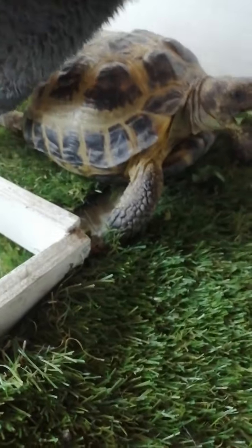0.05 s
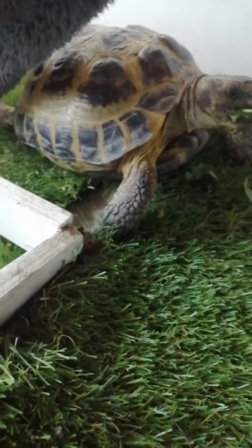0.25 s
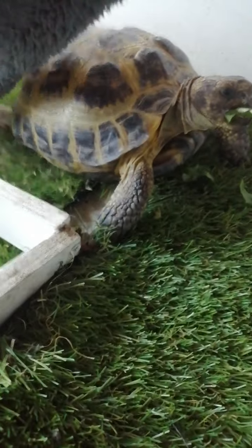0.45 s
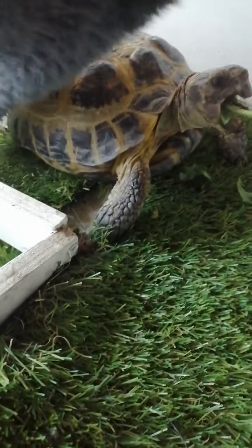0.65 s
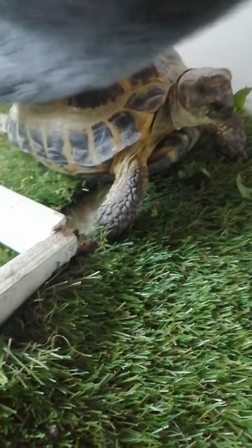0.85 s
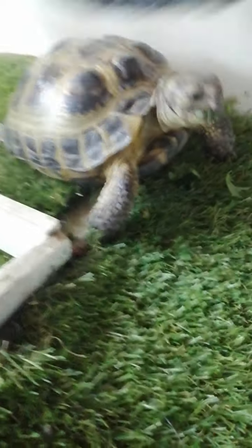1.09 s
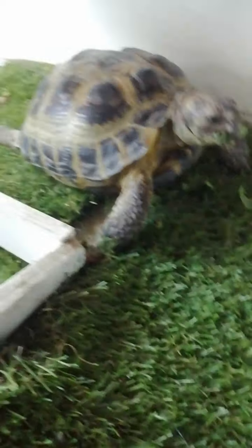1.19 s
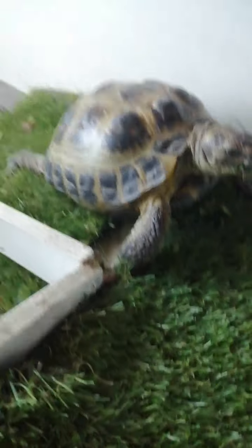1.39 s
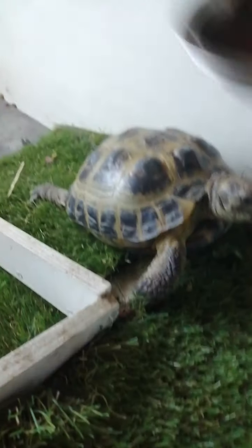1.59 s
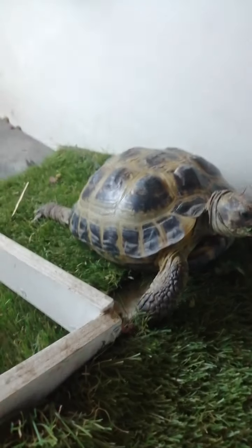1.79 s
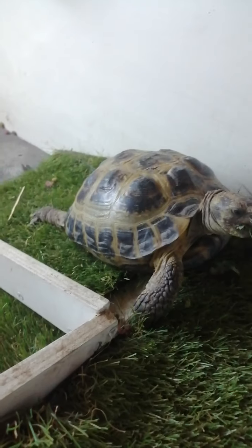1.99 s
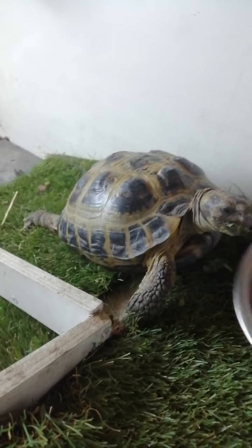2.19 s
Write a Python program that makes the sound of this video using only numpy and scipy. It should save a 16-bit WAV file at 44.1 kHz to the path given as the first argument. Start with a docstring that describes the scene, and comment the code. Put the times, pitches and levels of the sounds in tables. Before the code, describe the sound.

A tortoise bites and crunches a leaf up close, then the handheld camera rubs and bumps

```python
"""Indoors on artificial grass, a tortoise bites and chews a leaf close to a hand-held camera. Small crunches, a
dull bump at the bite and a hollow knock lead to a dense cluster of crunching: shaped bursts of random snaps.
Then the camera is moved: friction noise hisses and rumbles, brushing strokes swell, more dull bumps ring damped
modes and tiny noise puffs tick. A faint steady room noise lies underneath."""
import sys
import numpy as np
from scipy import signal
from scipy.fft import rfft, irfft
from scipy.io import wavfile

SR = 44100
rng = np.random.default_rng(int(sys.argv[2]) if len(sys.argv) > 2 else 0)


def master_out(mix):
    """Clip the mix to full scale and print it as 16-bit PCM to the path in sys.argv[1]."""
    frames = np.transpose(np.atleast_2d(mix))
    ceiling = np.clip(frames, -1, 1)
    pcm = np.round(ceiling * 32767).astype(np.int16)
    wavfile.write(sys.argv[1], SR, pcm)


N = 99225
T = np.arange(N) / SR  # seconds
HZ = np.fft.rfftfreq(N, 1 / SR)

# Spectrum of the still room. Each row: frequency in Hz, relative density in dB per Hz.
FLOOR_COLOUR = [(15, -30), (25, 5), (66, 0.5), (165, -1.5), (298, -28.5), (484, -21.5), (898, -19.5),
                (2070, -20.5), (2780, -19), (4170, -26), (6950, -13.5), (7750, -30.5), (15600, -27)]
FLOOR_DB = -62.5
ROOM_DB, ROOM_T60_S = -12.5, 0.11
SCATTER_DB, SCATTER_T60_S = 5.5, 0.022  # close reflections, level relative to the direct sound

# Rubbing on the camera, from low to high. Each row: time in seconds, level in dB before the trim in rubbing().
RUMBLE_LEVEL = [(0.0, -63), (0.14, -66), (0.28, -74), (0.5, -66.5), (0.64, -76.5), (0.9, -63),
                (1.41, -59.5), (1.62, -55), (1.75, -50.5), (1.8, -48), (2.05, -58), (2.25, -60.5)]
RUB_MID_LEVEL = [(0.76, -80), (0.8, -86.5), (0.876, -79.5), (1.02, -71.5), (1.398, -68.5), (1.424, -63),
                 (1.526, -65), (1.652, -55.5), (2.186, -62.5), (2.25, -55)]
RUB_HISS_LEVEL = [(0.76, -107), (1.124, -63), (1.262, -72), (1.282, -96), (1.498, -75.5), (1.602, -61.5),
                  (1.68, -70), (1.688, -56), (1.776, -64), (1.876, -58.5), (2.054, -68.5), (2.07, -58),
                  (2.128, -70), (2.25, -62)]
RUB_FIZZ_LEVEL = [(0.76, -86), (1.144, -60), (1.494, -71), (1.584, -65), (1.672, -73), (1.688, -61.5),
                  (1.746, -69.5), (2.078, -61.5), (2.146, -65.5), (2.25, -57.5)]
# Spectra of the rumble and of the higher rubbing. Each row: frequency in Hz, relative density in dB per Hz.
RUMBLE_COLOUR = [(25, -31), (50, 0), (85, 10), (120, 0), (160, -7), (195, -5), (265, 12), (330, -1.5),
                 (420, -12.5), (500, -11), (600, -21), (700, -67)]
RUB_COLOUR = [(600, 3), (720, -13), (850, -9.5), (1050, -10.5), (1400, -11), (1900, -10.5), (2250, -8.5),
              (2620, -13), (3200, -11), (4000, -15), (4800, -4), (5600, 7), (6200, 3), (6700, 7.5),
              (7400, -1), (8000, -9), (9000, -20.5), (12500, -31), (14200, -23), (14900, -10.5),
              (15600, -21)]
# Stereo lean of the rubbing. Each row: frequency in Hz, left-right difference in dB.
RUB_BALANCE = [(60, -8), (250, -7.5), (700, -5.5), (1300, -0.5), (2500, -10.5), (4400, -5.5), (6500, -19.5),
               (8000, -4.5), (10000, -4.5), (15000, -9)]
# The hiss's resonance drifts with the grip. Each row: time in seconds, centre in Hz.
HISS_CENTRE = [(0.8, 6700), (1.05, 6480), (1.15, 6900), (1.586, 5900), (1.622, 5600), (1.998, 6930),
               (2.25, 6560)]
HISS_WIDTH_HZ, HISS_RING_DB = 1000, 9
# Resonances of the rubbed case. Each row: frequency in Hz, width in Hz, relative level in dB.
CASE_RINGS = [(427, 58, 4), (828, 64, -2), (1180, 23, -1), (1520, 95, -13.5), (2570, 57, 0.5),
              (2585, 59, -30)]
RUB_GRAINS_PER_S, RUB_SPREAD_DB = 5000, 3.5

# Brushing strokes on the case. Each row: centre in seconds, half length in seconds, level in dB.
STROKES = [(1.653, 0.053, -57), (1.736, 0.021, -58), (1.842, 0.054, -57.5), (1.896, 0.033, -64.5)]
# Resonances that colour the strokes. Each row: frequency in Hz, width in Hz, relative level in dB.
STROKE_RINGS = [(1234, 60, -1), (1486, 110, -1.5), (2597, 210, 1)]

# Dull bumps. Each row: start in seconds, level in dB before the mode's own. The first comes with the bite; the
# rest reach the camera's case.
BUMPS = [(.2, -35.5), (1.2665, -31.5), (1.274, -80), (1.662, -35), (1.682, -26.5), (1.731, -41),
         (1.803, -36.5), (1.862, -42.5), (2.072, -43.5)]
# Modes of a bump. Each row: frequency in Hz, relative level in dB, 60 dB decay in seconds,
# left-right difference in dB, right ear lag in cycles.
BUMP_MODES = [(76, -5, 0.13, -3.5, 0.062), (170, -15, 0.11, -17, 0.0052), (232, -7, 0.089, -16, 0),
              (263.4, 6, 0.052, -3.5, 0.031), (350, -12, .05, -8, 0.034), (510, -24, 0.052, -14, 0.0051)]
# Tiny ticks. Each row: start in seconds, level in dB, brightness in dB per octave.
TICKS = [(.489, -49.5, 12), (1.0655, -49, 1.5), (1.074, -55, -1), (1.152, -46, 4), (1.2, -48, 4),
         (1.2986, -40.5, -13), (1.361, -51.5, -1.5), (1.865, -36.5, -7.5)]
TICK_DECAY_S = 0.002  # time constant

# Hollow knock and its rebounds. Each row: start in seconds, level in dB before the mode's own.
KNOCKS = [(.2535, -17), (.2618, -27), (.305, -43)]
# Modes of the knock. Each row: frequency in Hz, relative level in dB, 60 dB decay in seconds,
# left-right difference in dB, right ear lag in cycles.
KNOCK_MODES = [(177, -18, 0.17, -2, 0), (243.6, -9.5, 0.088, 3.5, 0.095), (330, 3.5, 0.047, -6.5, .05),
               (433, -14.5, 0.19, -7, 0.023), (480.5, -12, 0.13, -5, 0.18), (521, -1, 0.059, -4, 0.017),
               (616, -6.5, 0.029, -12, 0.0019), (760, -4, .045, 11, 0.32), (863, -17, 0.078, 24, 0.36),
               (948, -18, 0.055, 4, 0.17), (1526, -13, 0.017, -9, 0.21)]
BUMP_ATTACK_S, KNOCK_ATTACK_S = 0.0043, 0.0021  # time constants

# Edges of the five crunch bands, bass to fizz: a plain list in Hz.
BAND_EDGES = [70, 600, 2000, 4000, 8000, 16000]
# Crunches of the leaf. Each row: start in seconds, rise in seconds, decay time constant in seconds,
# then bass, body, ring, snap and fizz levels in dB before CRUNCH_TRIM_DB.
CRUNCHES = [ (0.023, 0.032, 0.027, -67, -62.5, -59.5, -48.5, -57),
            (0.195, 0.004, .012, -33, -41.5, -43.5, -40, -55.5),
            (0.21, 0.011, 0.039, -39.5, -54, -54, -44.5, -55.5),
            (0.252, 0.0018, 0.0028, -42, -34.5, -44, -59, -53),
            (0.362, 0.0098, 0.0082, -56, -63, -49.5, -36.5, -56.5),
            (0.399, 0.0039, 0.0064, -49, -69, -62, -45.5, -84),
            (.466, 0.0073, 0.025, -61, -77, -77, -56, -65),
            (0.503, 0.031, 0.071, -60, -63, -61.5, -54.5, -66),
            (0.575, .003, 0.014, -35.5, -32.5, -44, -41, -55),
            (0.585, 0.0071, 0.014, -66, -55, -44.5, -39, -40), (.606, .004, .012, -58, -44, -36, -47, -49),
            (0.613, 0.0067, 0.034, -41, -41, -38, -34.5, -38.5),
            (0.629, 0.012, 0.026, -46.5, -36.5, -37.5, -33.5, -41),
            (0.652, 0.005, 0.011, -56, -35, -25.5, -47, -41),
            (0.668, 0.0051, 0.012, -40.5, -40, -31, -44, -42.5),
            (0.71, 0.0061, 0.0033, -62, -51.5, -46, -42, -47.5),
            (0.788, 0.0027, 0.014, -106, -61, -72, -105, -91),
            (1.413, 0.0093, 0.047, -73, -73, -55, -74, -64)]
# Spectrum of the crunching. Each row: frequency in Hz, relative density in dB per Hz.
CRUNCH_COLOUR = [(70, 14), (130, -15), (230, 8.5), (400, -11), (520, -11.5), (740, -15.5), (950, -12),
                 (1300, -11.5), (1900, -12), (2150, -25), (2400, -7.5), (2750, -9), (2900, -17.5),
                 (3300, -11), (3900, -23.5), (5000, -7), (6400, 3), (7250, -8), (8050, -20.5), (8500, -13),
                 (9100, -18.5), (9750, -11.5), (10400, -22), (11500, -16), (13200, -21), (14200, -25),
                 (14900, -9), (15600, -36)]
# Stereo lean of the crunching. Each row: frequency in Hz, left-right difference in dB.
CRUNCH_BALANCE = [(100, 0.5), (380, -8.5), (700, -4), (1300, 3), (2000, 2), (2600, -11), (3300, 0.5),
                  (4400, -2), (6200, -11), (7200, -7.5), (9000, 2), (15000, -5)]
# Narrow resonances the crunches ring. Each row: frequency in Hz, width in Hz, relative level in dB.
CRUNCH_RINGS = [(502, 21, 16), (674, 16, 7), (957, 49, 9), (1038, 24, -6), (1310, 15, -10), (1620, 50, -26),
                (1902, 37, -5.5), (2302, 19, 8), (2460, 31, -12), (2600, 35, 10), (2800, 29, -2),
                (2777, 31, -8), (3050, 16, -5), (4040, 15, 10), (5300, 80, -15), (7220, 93, 0.5),
                (7125, 100, 1), (7195, 39, 7)]
SNAPS_PER_S, SNAP_SPREAD_DB, TEAR_SHARE = 2500, 3, 0.87
SNAP_ALIKE = 0.56  # left-right likeness, 0 to 1
EAR_LAG_S = 0.00014  # the crunches reach the right ear later
CRUNCH_TRIM_DB = -5
EDGE_HZ = 15750


def amp(db):
    """Decibels to gain."""
    return 10 ** (np.asarray(db) / 20)


def unit(x):
    """Scales to rms 1."""
    return x / np.sqrt(np.mean(x ** 2) + 1e-20)


def read(points):
    """Reads a spectrum on a log-frequency axis."""
    f, value = np.transpose(points)
    return np.interp(np.log(HZ + 1), np.log(f + 1), value)


def curve(points):
    """Reads a control curve at every sample."""
    return np.interp(T, *np.transpose(points))


def ears(balance_db):
    """Left and right gains of constant power."""
    gain = amp(np.array([balance_db, -balance_db]) / 2).reshape(2, -1)
    return gain / np.sqrt(np.mean(gain ** 2, 0))


def shaped(x, gain):
    """Colours a signal and sets its rms to 1."""
    return unit(irfft(rfft(x) * gain, N))


def band(lo, hi):
    """Gain of a steep band-pass between two frequencies in Hz."""
    return 1 / np.sqrt((1 + (lo / (HZ + 1)) ** 16) * (1 + (HZ / hi) ** 16))


def pair(x, alike_below_hz=600):
    """Two signals made alike in the bass, as at two close microphones."""
    a, b = rfft(x)
    same = 0.97 / (1 + (HZ / alike_below_hz) ** 4)
    return irfft(np.array([a, same * a + np.sqrt(1 - same ** 2) * b]), N)


def grains(per_s, spread_db):
    """A random train of clicks, a few of them large."""
    size = amp(spread_db * np.minimum(rng.exponential(1, N), 4))
    fires = rng.random(N) < per_s / SR
    return unit(size * fires * rng.standard_normal((2, N)))


def ringing(x, rings):
    """What narrow resonances give back when a sound drives them."""
    response = sum(amp(db) / (1 + 2j * (HZ - hz) / width) for hz, width, db in rings)
    return irfft(rfft(x) * response, N)


def resonate(x, hz, width_hz):
    """A resonance that follows the curve hz: shift it down to zero, smooth, shift back up."""
    turn = np.exp(2j * np.pi * np.cumsum(hz) / SR)
    r = np.exp(-np.pi * width_hz / SR)
    return 2 * (turn * signal.lfilter([1 - r], [1, -r], x / turn)).real


def struck(blows, modes, attack_s):
    """Blows that ring one set of damped modes, each a decaying sine with a soft attack."""
    out = np.zeros((2, N))
    for start, db in blows:
        t = np.maximum(T - start, 0)[:int(start * SR) + SR // 3]
        attack = 1 - np.exp(-t / attack_s)
        for hz, mode_db, t60, balance_db, lag in modes:
            swing = np.sin(2 * np.pi * (hz * t - np.array([[0], [lag]])))
            decay = amp(db + mode_db - 60 * t / t60)
            out[:, :len(t)] += ears(balance_db) * swing * decay * attack
    return out


def floor():
    """Steady room noise: coloured noise, alike in both ears at the bass."""
    noise = pair(rng.standard_normal((2, N)))
    return amp(FLOOR_DB) * shaped(noise, amp(read(FLOOR_COLOUR))) * ears(-0.83)


def room(x):
    """A faint, short tail from the nearby walls: decaying noise as an echo pattern."""
    t = T[:SR // 3]
    tail = rng.standard_normal((2, len(t))) * amp(-60 * t / ROOM_T60_S) * (t > 0.004)
    return amp(ROOM_DB) * signal.fftconvolve(x, tail / np.linalg.norm(tail[0]), axes=1)[:, :N]


def scattered(x):
    """Dense, fast-fading reflections from shell, floor and camera smear and colour each snap."""
    t = T[:1500]
    taps = rng.standard_normal((2, len(t))) * amp(-60 * t / SCATTER_T60_S)
    taps *= amp(SCATTER_DB) / np.linalg.norm(taps, axis=1, keepdims=True)
    taps[:, 0] += 1  # direct sound
    taps /= np.linalg.norm(taps, axis=1, keepdims=True)
    return signal.fftconvolve(x, taps, axes=1)[:, :N]


def rubbing():
    """Fine friction grains pass the camera's case: a low rumble, case resonances and a drifting hiss."""
    grit = grains(RUB_GRAINS_PER_S, RUB_SPREAD_DB)
    friction = pair(grit + 0.89 * rng.standard_normal((2, N)))
    case = friction + ringing(friction, CASE_RINGS)
    sides = ears(read(RUB_BALANCE))
    low = amp(read(RUMBLE_COLOUR)) * sides
    high = amp(read(RUB_COLOUR)) * sides
    rumble = shaped(case, low * band(18, 430))
    mid = shaped(case, high * band(528, 4440))
    hiss = shaped(friction, high * band(5000, 8400))
    drifting = unit(resonate(hiss, curve(HISS_CENTRE), HISS_WIDTH_HZ))
    hiss = unit(hiss + amp(HISS_RING_DB) * drifting)
    fizz = shaped(friction, high * band(8940, 13700))
    # each level curve is trimmed by a fixed number of dB
    return (amp(curve(RUMBLE_LEVEL) + 2) * rumble
            + amp(curve(RUB_MID_LEVEL) + 2) * mid
            + amp(curve(RUB_HISS_LEVEL) + 6) * hiss
            + amp(curve(RUB_FIZZ_LEVEL) + 1) * fizz)


def strokes():
    """Grainy brushing that swells and fades in a few case resonances."""
    level = sum(amp(db) * np.exp(-((T - centre) / half) ** 2) for centre, half, db in STROKES)
    drive = pair(grains(RUB_GRAINS_PER_S, RUB_SPREAD_DB))
    brushed = 0
    for hz, width, db in STROKE_RINGS:
        once = ringing(drive, [(hz, width, 0)])
        brushed = brushed + ringing(once, [(hz, width, db)])  # second pass steepens the skirts
    return level * ears(-4) * unit(brushed)


def bumps():
    """Dull bumps: low, quickly damped modes with a soft attack."""
    return struck(BUMPS, BUMP_MODES, BUMP_ATTACK_S)


def ticks():
    """Very short puffs of noise, dull or bright, that start at once and die away."""
    out = np.zeros((2, N))
    for start, db, tilt_db in TICKS:
        tilt = amp(tilt_db * np.log2(HZ + 1))
        puff = shaped(pair(rng.standard_normal((2, N))), tilt * band(233, 21000))
        out += amp(db) * puff * (T >= start) * np.exp(-abs(T - start) / TICK_DECAY_S)
    return out * ears(-2.5)


def knock():
    """A hollow knock and its weaker rebounds, all ringing the same damped modes."""
    return struck(KNOCKS, KNOCK_MODES, KNOCK_ATTACK_S)


def crunches():
    """Bursts of snapping leaf fibres swell and die, and ring a set of narrow resonances."""
    snaps = grains(SNAPS_PER_S, SNAP_SPREAD_DB)
    tearing = TEAR_SHARE * rng.standard_normal((2, N))
    a, b = snaps + tearing
    fibres = np.array([SNAP_ALIKE * a + np.sqrt(1 - SNAP_ALIKE ** 2) * b, a])
    lag = np.exp(-2j * np.pi * HZ * np.array([[0], [EAR_LAG_S]]))
    colour = amp(read(CRUNCH_COLOUR)) * ears(read(CRUNCH_BALANCE)) * lag

    power = 0  # one row per band; overlapping bursts add in power
    for start, rise, decay, *levels_db in CRUNCHES:
        t = T - start
        burst = np.clip(t / rise, 0, 1) * np.exp(-np.maximum(t - rise, 0) / decay)
        power = power + (amp(levels_db)[:, None] * burst) ** 2

    bands = [np.sqrt(p) * shaped(fibres, colour * band(lo, hi))
             for p, lo, hi in zip(power, BAND_EDGES, BAND_EDGES[1:])]
    bass, body, ring, snap, fizz = bands
    low = bass + body + ring
    high = snap + fizz
    return amp(CRUNCH_TRIM_DB) * (low + scattered(high) + ringing(low + high, CRUNCH_RINGS))


def scene():
    """Chewing and the knock in the room, plus dull bumps (the first at the bite) and handling noise on the
    camera."""
    near = crunches() + knock()
    chewing = near + room(near)
    bumps_and_handling = bumps() + ticks() + rubbing() + strokes()
    return chewing + bumps_and_handling + floor()


def record(dry):
    """The recorder's band limit: a steep low-pass that keeps the timing."""
    low_pass = signal.firwin(511, EDGE_HZ, window=("kaiser", 9), fs=SR)
    return signal.oaconvolve(dry, low_pass[None], "same")


dry = scene()
out = record(dry)
master_out(out)
```